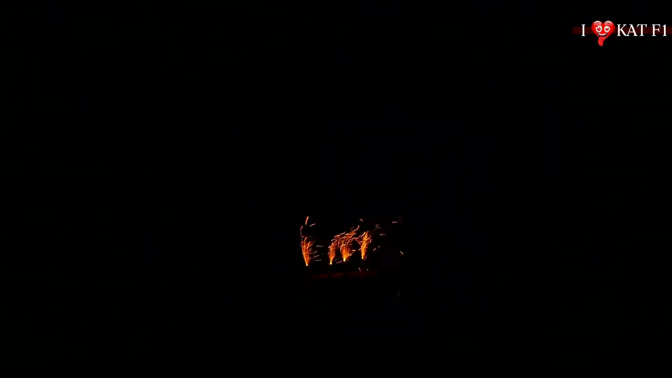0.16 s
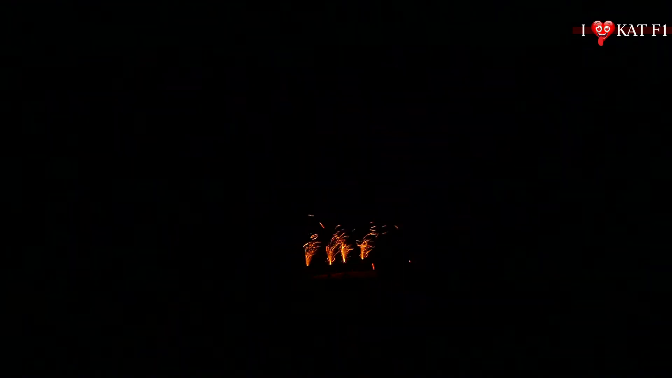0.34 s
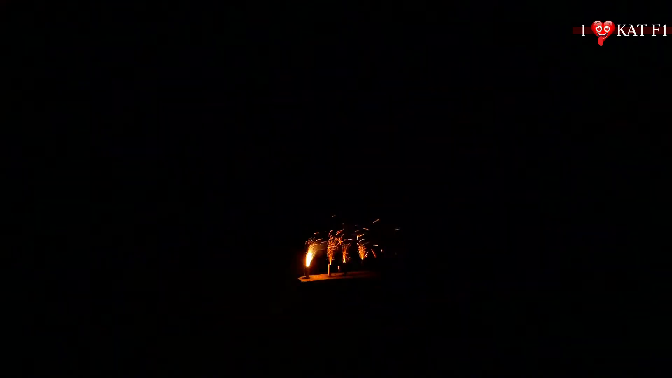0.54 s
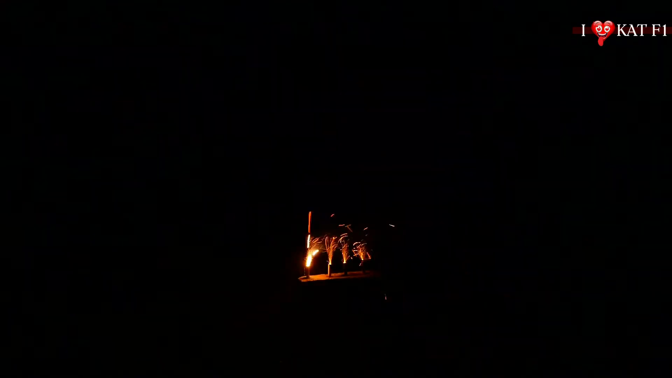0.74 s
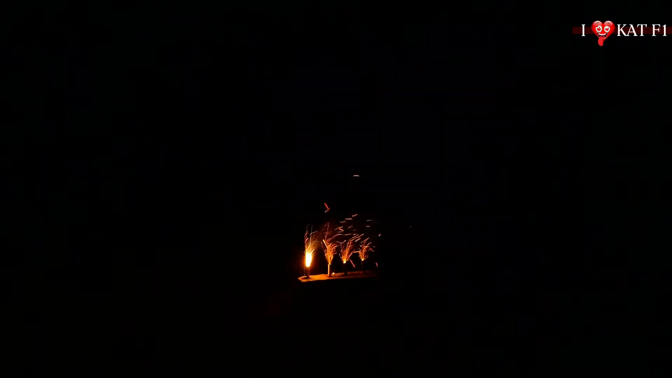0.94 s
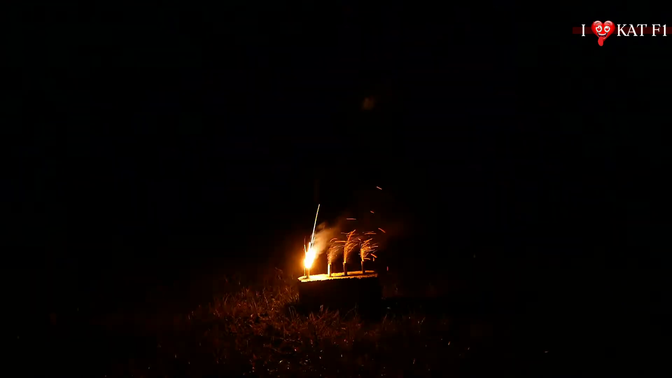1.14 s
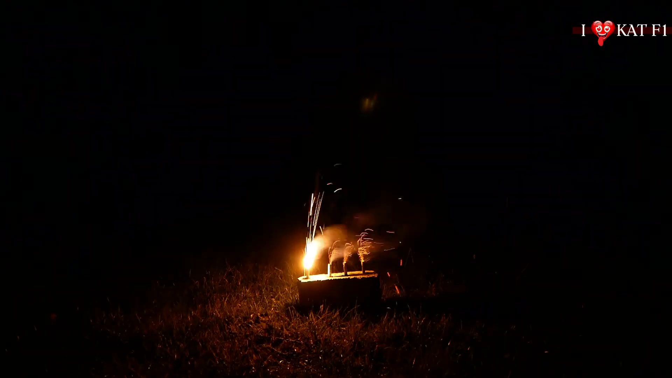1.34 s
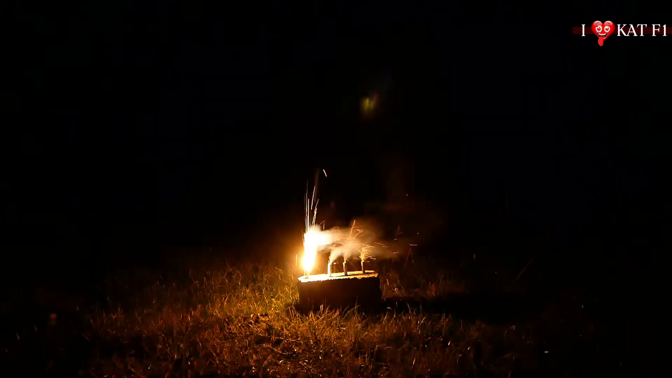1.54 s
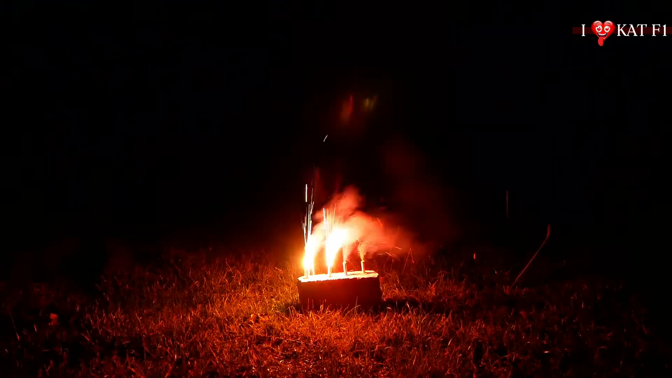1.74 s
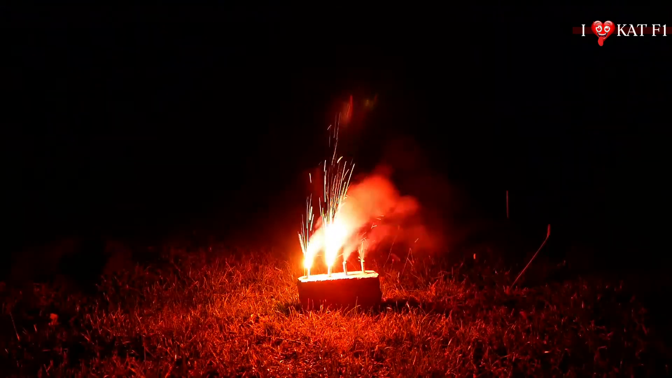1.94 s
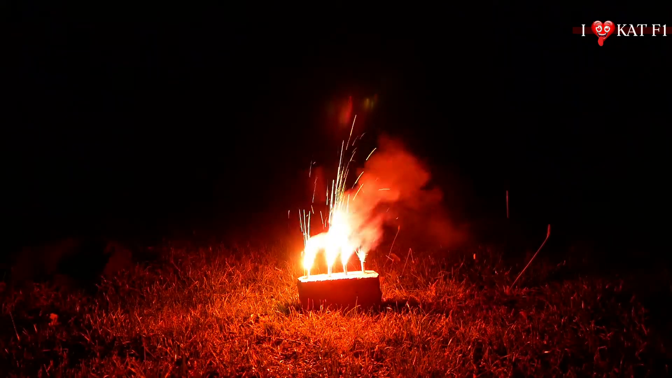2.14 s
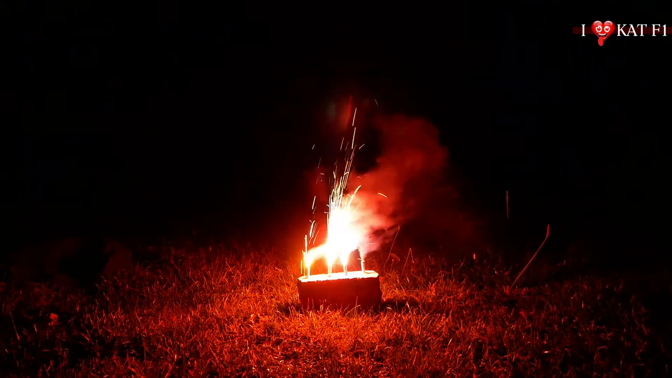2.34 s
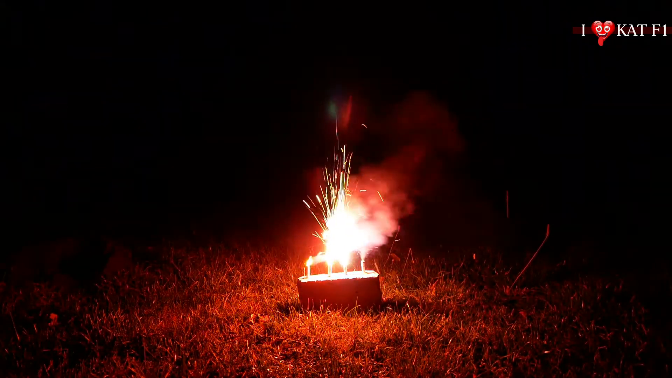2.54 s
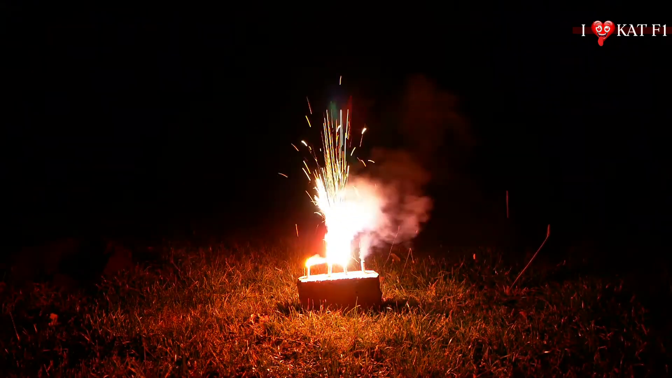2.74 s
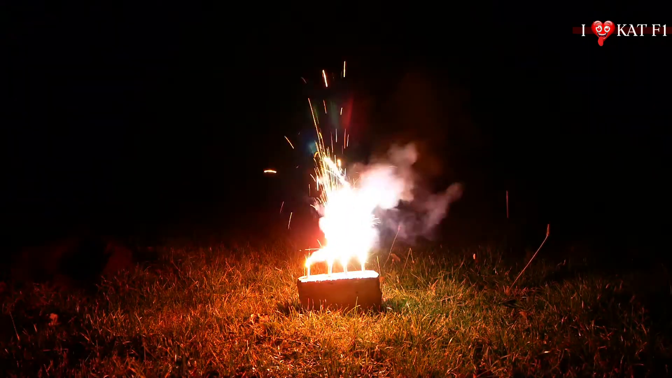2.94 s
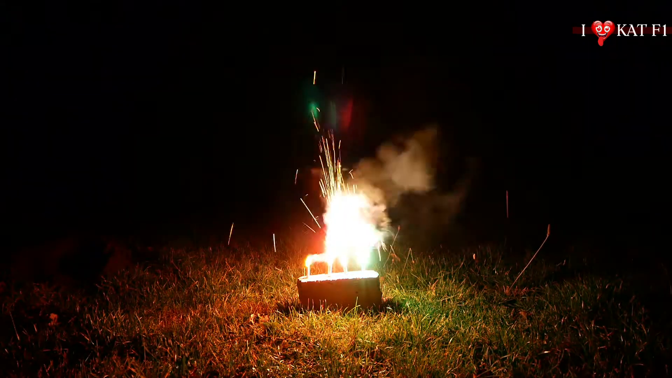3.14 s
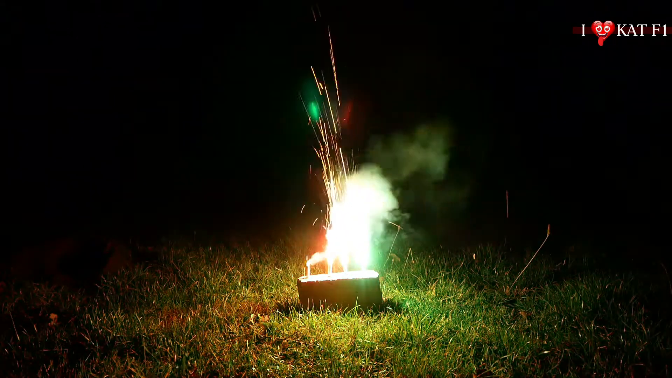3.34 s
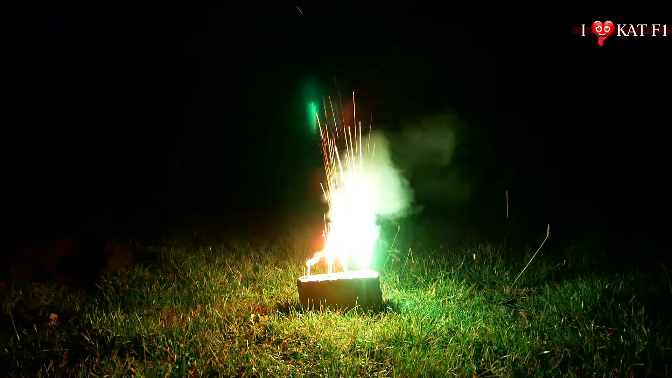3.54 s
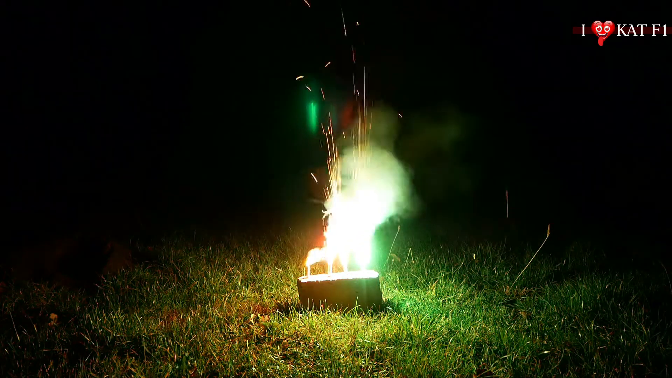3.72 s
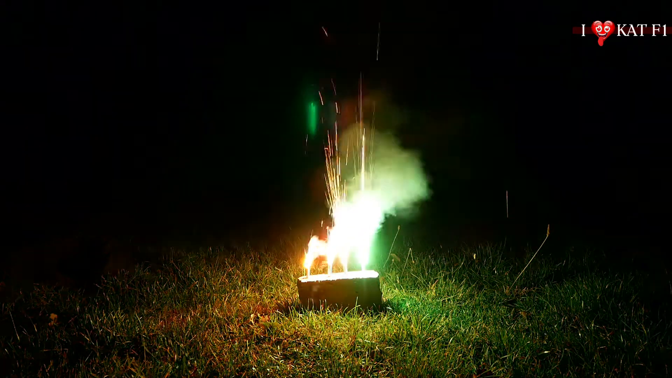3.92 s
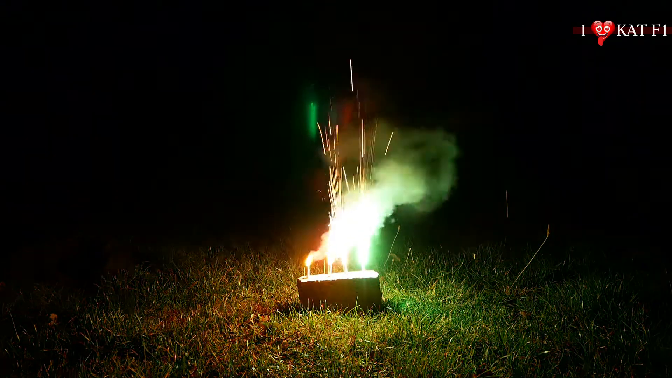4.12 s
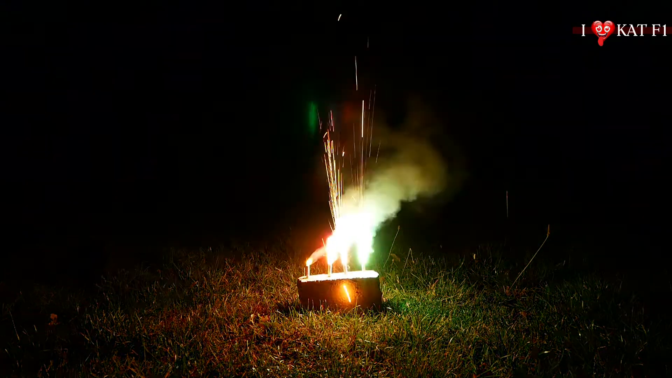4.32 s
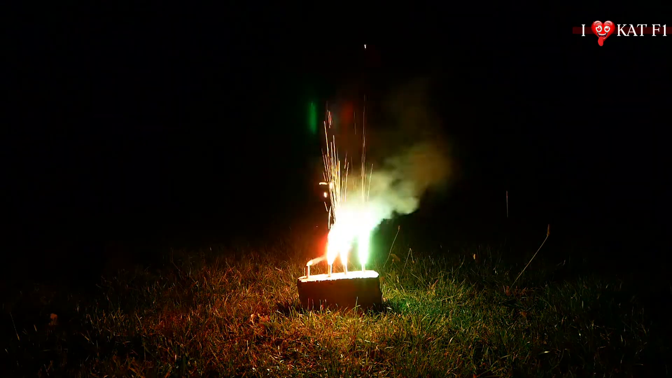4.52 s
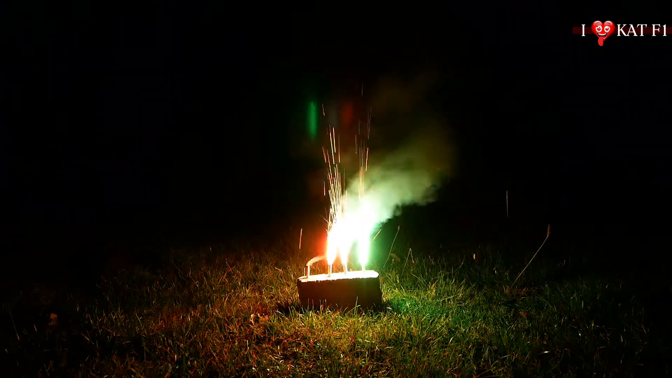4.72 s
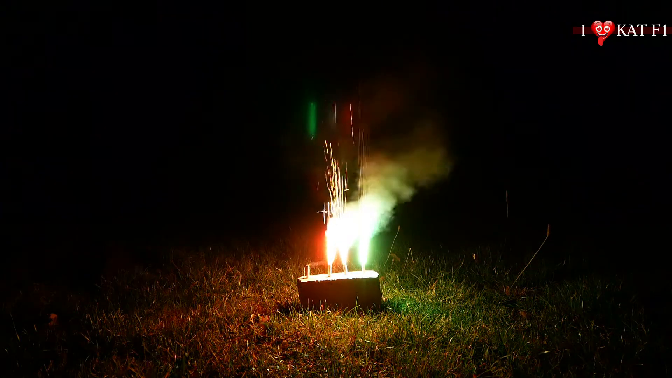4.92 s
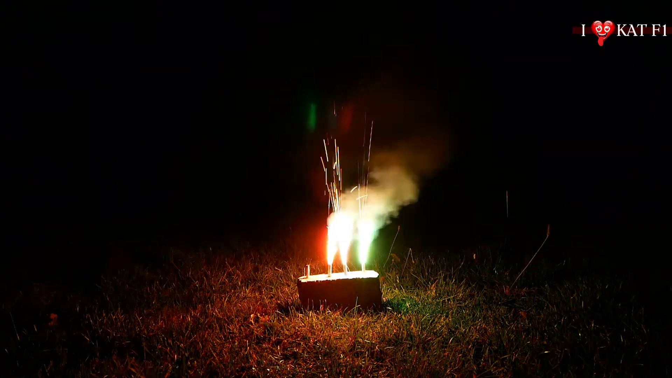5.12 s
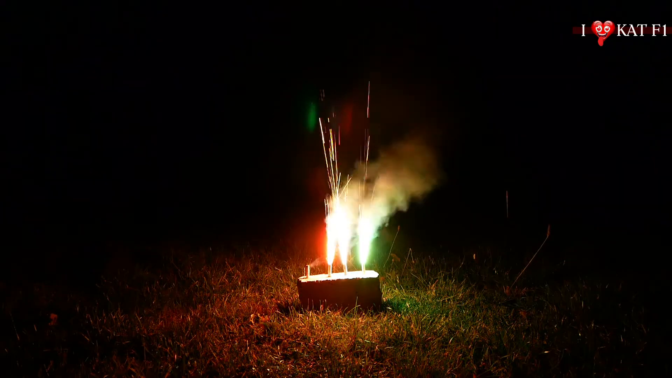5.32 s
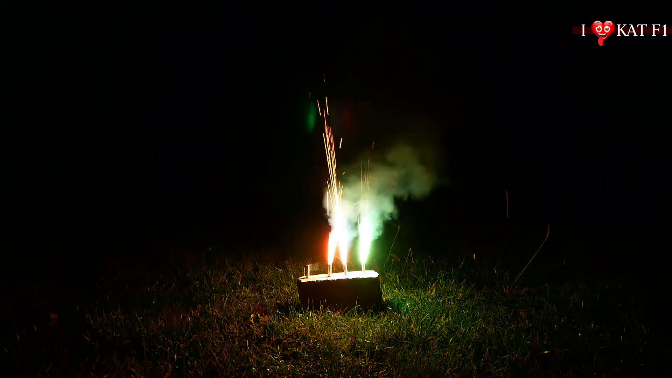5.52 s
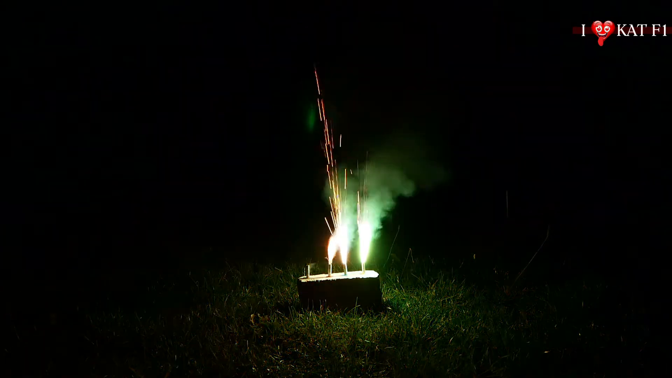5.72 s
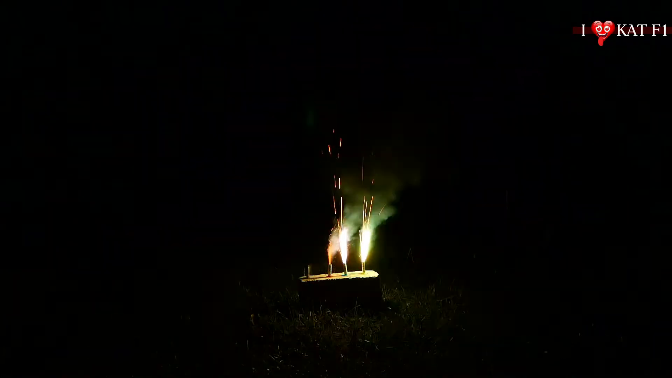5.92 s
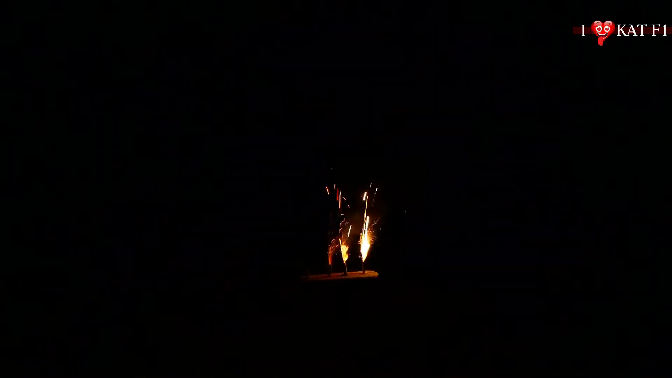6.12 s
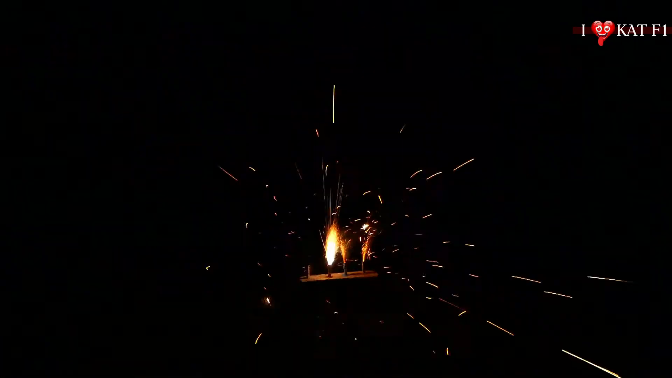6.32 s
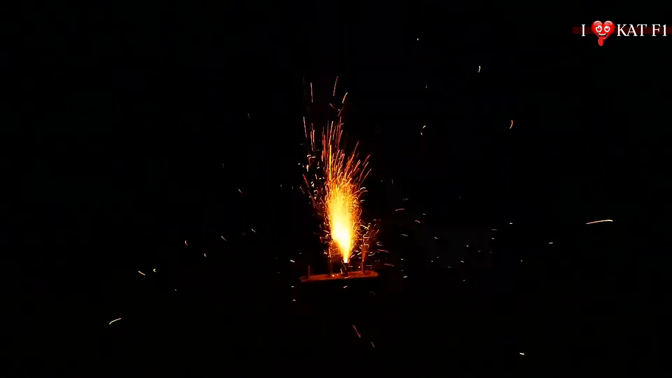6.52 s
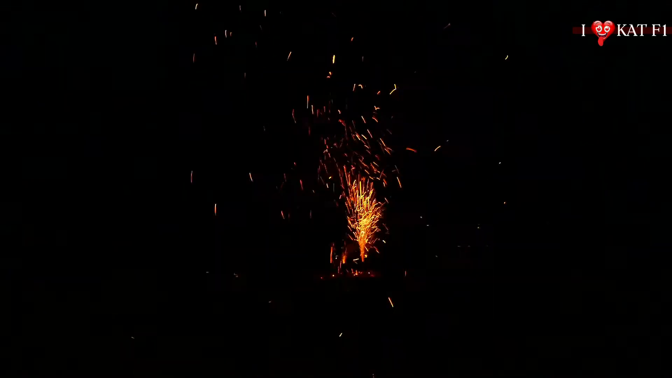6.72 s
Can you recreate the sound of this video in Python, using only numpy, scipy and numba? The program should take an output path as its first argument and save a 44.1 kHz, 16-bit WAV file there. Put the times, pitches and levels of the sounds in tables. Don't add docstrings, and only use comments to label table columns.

```python
import sys
import numpy as np
from scipy import signal
from scipy.fft import rfft, irfft, next_fast_len
from scipy.io import wavfile
from scipy.ndimage import uniform_filter1d
from numba import njit

SR = 44100
rng = np.random.default_rng(int(sys.argv[2]) if len(sys.argv) > 2 else 0)


def persist_wave(psi):
    counts = np.round(np.clip(psi, -1, 1) * 32767).astype(np.int16)
    wavfile.write(sys.argv[1], SR, np.atleast_2d(counts).T)


def ratio(d):
    e = np.asarray(d, float) / 20
    return 10 ** e


N = 298115

# (time [s], thrust [dB], centre [Hz])
JET = [(0.0, -46.5, 7600), (0.1, -49.5, 7100), (0.3, -47, 7500), (0.8, -48.5, 6860), (0.84, -40, 7300),
       (1.11, -45, 7060), (1.53, -43.5, 7700), (1.57, -39, 8000), (2.0, -43.5, 7340), (2.5, -40, 7550),
       (2.8, -37, 7550), (3.2, -35, 7370), (3.899, -34.5, 7520), (4.4, -38, 6730), (4.84, -38.5, 6500),
       (5.5, -42, 5920), (5.8, -46, 5330), (6.3, -59, 4800)]
# (time [s], level [dB], centre [Hz])
THIN_TUBE = [(0, -53, 9600), (.3, -47, 10100), (.6, -44, 10600), (1.1, -49, 10700), (1.5, -57, 9700),
             (1.8, -43.5, 9800), (2.3, -42.5, 10100), (2.7, -37, 9500), (3.2, -47, 9400),
             (4.0, -38.5, 9300), (4.7, -42.5, 9000), (5.6, -46, 9000), (6.3, -60, 9100)]
# (time [s], level [dB])
FLAME = [(0, -54.5), (0.5, -53.5), (1.5, -56.5), (1.7, -45.5), (2.3, -47.5), (3.0, -42.5), (3.6, -35),
         (4.0, -40.5), (4.4, -42), (5.8, -42.5), (6.0, -51), (6.3, -55)]
# (peak time [s], rise [s], fall [s], roar [dB], sputter [dB])
FLARES = [(0.0, .02, 0.026, -47, -48), (0.16, 0.093, 0.074, -52.5, -44.5), (0.68, 0.14, 0.091, -49, -49.5),
          (0.85, 0.083, 0.31, -48, -47.5), (1.94, 0.15, 0.049, -42.5, -40.5),
          (2.25, 0.29, 0.12, -45.5, -44), (2.43, 0.026, 0.28, -38.5, -37), (2.6, 0.047, 0.066, -42, -28.5),
          (2.689, 0.06, 0.073, -32.5, -31), (2.81, 0.086, 0.035, -34, -36),
          (3.23, 0.087, 0.024, -34.5, -31), (3.31, 0.053, 0.22, -39, -28.5),
          (3.5, 0.021, 0.051, -30.5, -29.5), (3.75, 0.23, 0.21, -40.5, -37), (5.49, 0.21, .15, -63, -44.5),
          (6.035, 0.032, 0.036, -38, -42), (6.095, .01, 0.012, -36, -43), (6.13, 0.041, 0.045, -41, -62)]
# (time [s], peak [dB], length [s])
GULPS = [(1.244, -38, 0.0072), (1.674, -48, 0.005), (1.91, -31, 0.0053), (1.956, -32, 0.0067),
         (2.154, -30, 0.0065), (2.549, -21, 0.006), (2.631, -22, 0.0067), (2.67, -18, 0.0065),
         (2.696, -38, 0.0027), (2.801, -18, 0.0031), (2.851, -22.5, 0.012), (3.374, -40, 0.0041),
         (3.391, -34, 0.0046), (3.494, -29, 0.0049), (6.052, -34, 0.005)]
# (time [s], blast [dB], suction length [s], fragments [dB], scattered tail [dB])
STARS = [(6.3297, -1.5, 0.0014, -2, -24), (6.357, -38, 0.00085, -18, -38),
         (6.3826, -3.5, 0.0016, -8.5, -20), (6.4822, -9.5, 0.0015, -8, -30), (6.4958, -6, .0015, -7.5, -17),
         (6.4986, -0.5, 0.0022, 3, -3), (6.521, -0.5, .0015, -2, -10), (6.549, -21, 0.00072, -12, -18),
         (6.566, -2, 0.0015, -11, -33), (6.5728, -14, 0.0013, -8.5, -14.5), (6.6709, -7, 0.0014, -6, -36),
         (6.683, -1.5, 0.001, -3.5, -22.5), (6.685, -4.5, 0.0008, -13, -30), (6.699, -35, .001, -19, -36),
         (6.7138, 1.5, 0.0016, 6, -9), (6.741, -22, 0.0011, -12, -17)]
# (frequency [Hz], level [dB])
GARDEN = [(24, -39), (40, -8), (64, -22), (150, -11.5), (1220, -11.5), (2770, -12), (7890, -10),
          (15500, -20.5)]
# (centre [Hz], width [share of centre], level [dB])
HOUSING = [(1850, 0.32, 2), (2720, 0.14, 1.5), (4420, 0.084, -0.5), (5920, 0.25, -2), (12300, 0.1, -2)]

SPUTTER_DB, SPUTTER_FOLLOWS = -46, 0.2
SPENT_S, SPENT_DB_PER_S = 5.93, 28
SIZZLE_DB, SIZZLE_FULL_S, SIZZLE_ENDS_S = -42.5, 2.03, 3.4
SIZZLE_RISE_DB_PER_S, SIZZLE_FALL_DB_PER_S = 7, 3.5
LEFT_DB = np.array([[.6], [-.6]])
MIRROR_DB, MIRROR_FULL_S = 7, 0.001
STAR_ECHO_S, FENCE_S = 0.00064, 0.0068
GROUND_S, GROUND_HZ, FIRE_ECHO = 0.0008, 4770, 0.022
HOLLOW_HZ, HOLLOW_WIDTH, HOLLOW_DB, HOLLOW_DRIFT = 3430, .15, -7, .018
NIGHT_DB, TOWN_DB = -66, -63
PORT_LAG_S, TOP_HZ = .000025, 15700
OPPOSITE = np.array([[1], [-1]])


def fountain():
    t = np.arange(N) / SR
    time_s, jet_db, jet_hz = np.transpose(JET)
    jet_db, jet_hz = np.interp(t, time_s, jet_db), np.interp(t, time_s, jet_hz)
    flame_db = np.interp(t, *np.transpose(FLAME))
    spent_db = SPENT_DB_PER_S * np.maximum(t - SPENT_S, 0)
    sputter_db = SPUTTER_DB + SPUTTER_FOLLOWS * (flame_db + 45) - spent_db
    steady = ratio(np.array([flame_db, sputter_db]))
    roar_size, sputter_size = np.sqrt(steady ** 2 + flares(t))
    thickening_db = SIZZLE_RISE_DB_PER_S * np.maximum(SIZZLE_FULL_S - t, 0)
    thinning_db = SIZZLE_FALL_DB_PER_S * np.maximum(t - SIZZLE_ENDS_S, 0)
    sizzle_db = SIZZLE_DB - thickening_db - thinning_db - spent_db

    flutter = walk(35)
    gulp = sum(ratio(db) * np.exp(-((t - at) / length) ** 2) for at, db, length in GULPS)
    roar, sputter = flame_roar(), flame_sputter()
    flame = ratio(1.6 * flutter - 3) * roar_size * roar
    flame += ratio(0.85 * flutter - 2.0) * sputter_size * sputter
    flame += gulp * (0.2 * roar + 0.14 * sputter)
    jet = ratio(jet_db + 0.46 * flutter + 5.0) * gas_jet(jet_hz)
    sizzle = level(band(turbulent(0.19, 8.2, 0.4), 12760, 1.0))
    return flame + jet + ratio(sizzle_db + 7.5) * sizzle


def flame_roar():
    roar = band(band(turbulent(0.67, 23, 0.66), 310, 3.9), 380, 3.7)
    return high(level(low(roar, 440)), 45, 2)


def flame_sputter():
    grains = turbulent(0.43, 25.44, 0.84)
    dull = low(band(grains, 1630, 1.87) + 0.23 * band(grains, 1700, .5), 2250)
    return level(dull + 0.52 * band(grains, 3860, 0.6))


def gas_jet(jet_hz):
    gas = turbulent(0.44, 12, 0.45)
    centre_hz = jet_hz * (1 + .015 * walk(3))
    hiss = band(band(gas, 1.01 * centre_hz, 0.66), 1.115 * centre_hz, 0.98)
    tube = 0.2 * (8000 / jet_hz) ** 5.25 * band(gas, 5130, 0.57)
    return level(hiss + tube + 0.39 * gas)


def flares(t):
    power = np.zeros((2, N))
    for at, rise, fall, roar_db, sputter_db in FLARES:
        bell = np.exp(-2 * ((t - at) / np.where(t < at, rise, fall)) ** 2)
        power += ratio(np.array([[roar_db], [sputter_db]])) ** 2 * bell
    return power


def thin_tube():
    time_s, db, hz = np.transpose(THIN_TUBE)
    t = np.arange(N) / SR
    hiss = level(band(turbulent(0.83, 18, 0.22), np.interp(t, time_s, hz), 0.19))
    return ratio(np.interp(t, time_s, db)) * hiss


def stars(likeness=0.91):
    blast, tail = np.zeros((2, N)), np.zeros(N)
    t = np.arange(int(.3 * SR)) / SR
    spray = rng.standard_normal((len(STARS), 2, len(t)))
    spray = dull_by(spray, 11000)
    for (at, db, length, fragments_db, tail_db), (mid, side) in zip(STARS, spray):
        i = int(at * SR)
        u = t[:N - i]
        here = slice(i, i + len(u))
        shock = 5.5 * np.exp(-u / .00006)
        suction = 2.0 * np.sqrt(np.clip(1 - (u / length) ** 2, 0, 1)) ** 1.5
        late = np.maximum(u - length, 0) / (.5 * length)
        swing = .4 * late * np.exp(1 - late) + .2 * (1 - np.exp(-late)) * np.exp(-u / .006)
        settling = (length / .0017) ** 2 * swing
        echo = ratio(db + MIRROR_DB) / (1 + (MIRROR_FULL_S / length) ** 8)
        mirror = echo * np.exp(-((u - STAR_ECHO_S) / .00009) ** 2)
        blast[:, here] += ratio(db + LEFT_DB) * (shock - suction + settling) + mirror

        burst = 1.74 * np.exp(-u / 0.00094) + 1.06 * np.exp(-u / 0.0028)
        burst += .12 * np.exp(-((u - FENCE_S) / 0.00069) ** 2)
        fragments = np.sqrt(likeness) * mid + np.sqrt(1 - likeness) * side * OPPOSITE
        blast[:, here] += ratio(fragments_db) * burst * fragments[:, :len(u)]

        build_up = 1 - np.exp(-u / 0.00079)
        decay = np.exp(-u / 0.035) + 0.088 * np.exp(-u / 0.076)
        tail[here] += (ratio(tail_db) * build_up * decay) ** 2
    return blast, np.sqrt(tail)


def via_lawn(x, gain):
    return x + gain * dull_by(delay(x, GROUND_S), GROUND_HZ)


def drifting_hollow(fire):
    hollow_hz = HOLLOW_HZ * (1 + HOLLOW_DRIFT * walk(9.8))
    return fire + (ratio(HOLLOW_DB) - 1) * band(fire, hollow_hz, HOLLOW_WIDTH)


def garden(likeness=0.65):
    size = next_fast_len(N)
    hz = np.fft.rfftfreq(size, 1 / SR)
    table_hz, table_db = np.transpose(GARDEN)
    colour = ratio(np.interp(np.log(hz + 1), np.log(table_hz), table_db))
    patchy = ratio(2.0 * walk(70))

    def scatter():
        pops = turbulent(1.0, 200, 0.56)
        return level(patchy * irfft(rfft(pops, size) * colour, size)[:N])

    mid, side = scatter(), scatter()
    side = band(side, 3900, 15.0) + 0.36 * band(side, 13000, .8)
    return np.sqrt(likeness) * mid, np.sqrt(1 - likeness) * side


def night():
    rumble = level(band(band(turbulent(2.5, 24, .01), 78, 0.66), 78, 0.75))
    traffic = level(band(band(turbulent(1.1, 2.9, .01), 550, 2.7), 550, 2.7))
    return ratio(NIGHT_DB + 1.0) * rumble + ratio(TOWN_DB) * traffic


def turbulent(flicker_db, rate, grit):
    return ratio(flicker_db * walk(rate)) * (rng.standard_normal(N) + grit * sparks(2.35))


def sparks(scatter_db, count=10000):
    out = np.zeros(N)
    moments = rng.integers(0, N, count)
    pulses = rng.standard_normal(count)
    out[moments] = pulses * ratio(scatter_db * np.minimum(rng.exponential(size=count), 3))
    return level(out)


def walk(rate):
    hold = int(SR / rate)
    steps = rng.standard_normal(size=4000)[np.arange(N) // hold]
    return level(uniform_filter1d(uniform_filter1d(steps, hold), hold))


def level(x):
    return x / np.sqrt(np.mean(x ** 2))


@njit
def svf(x, hz, width):
    y, b, l = np.empty(len(x)), 0., 0.
    for i in range(len(x)):
        g = np.tan(np.pi * hz[i] / SR)
        v = (b + g * (x[i] - l)) / (1 + g * (g + width))
        b = 2 * v - b
        l += 2 * g * v
        y[i] = width * v
    return y


def band(x, hz, width):
    return svf(x, np.clip(hz * np.ones(len(x)), 20., .45 * SR), float(width))


def low(x, hz):
    return signal.sosfilt(signal.butter(3, hz, fs=SR, output="sos"), x)


def high(x, hz, order):
    return signal.sosfilt(signal.butter(order, hz, "high", fs=SR, output="sos"), x)


def dull_by(x, hz):
    return signal.lfilter(*signal.butter(1, hz, fs=SR), x)


def delay(x, s):
    size = next_fast_len(N + 4096)
    turn = np.exp(-2j * np.pi * np.fft.rfftfreq(size, 1 / SR) * s)
    return irfft(rfft(x, size) * turn, size)[..., :N]


def scene():
    blast, tail = stars()
    mid, side = garden()
    fire = drifting_hollow(via_lawn(fountain() + thin_tube(), FIRE_ECHO))
    heard = fire + blast + night()
    heard[1] = delay(heard[1], PORT_LAG_S)
    apart = fountain()
    apart = 0.14 * apart + 0.16 * band(apart, 3500, 0.67)
    difference = apart + tail * side + 0.72 * night()
    port_gain = ratio(np.array([[.2], [-.2]]))
    return (heard + tail * mid + difference * OPPOSITE) * port_gain


def band_limit(x):
    return signal.sosfilt(signal.butter(12, 15610, fs=SR, output="sos"), x)


def record(dry):
    for hz, width, db in HOUSING:
        dry = dry + (ratio(db) - 1) * signal.lfilter(*signal.iirpeak(hz, 1 / width, SR), dry)
    clipped = np.clip(high(dry, 34, 1), -.97, .97)
    mix = signal.sosfilt(signal.ellip(8, .2, 70, TOP_HZ, fs=SR, output="sos"), clipped)
    return band_limit(mix)


dry = scene()
out = record(dry)
persist_wave(out)
```